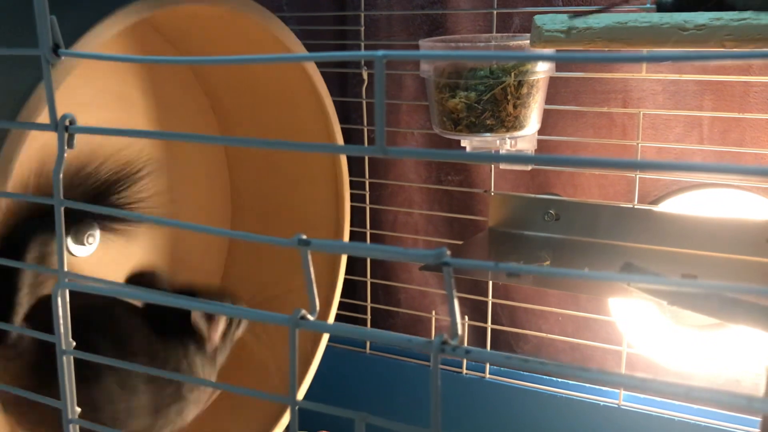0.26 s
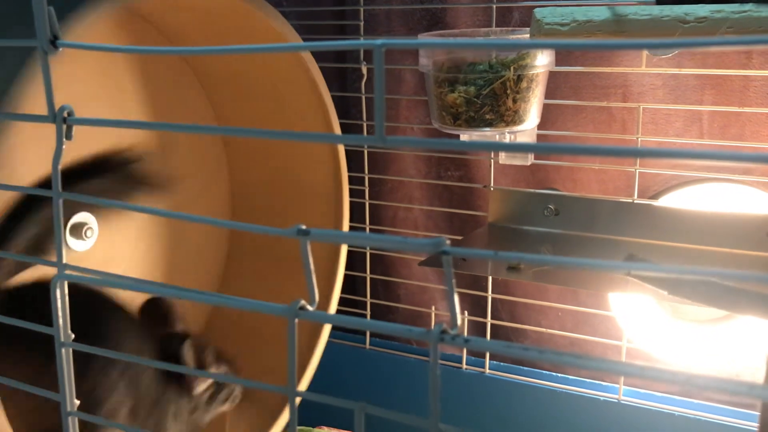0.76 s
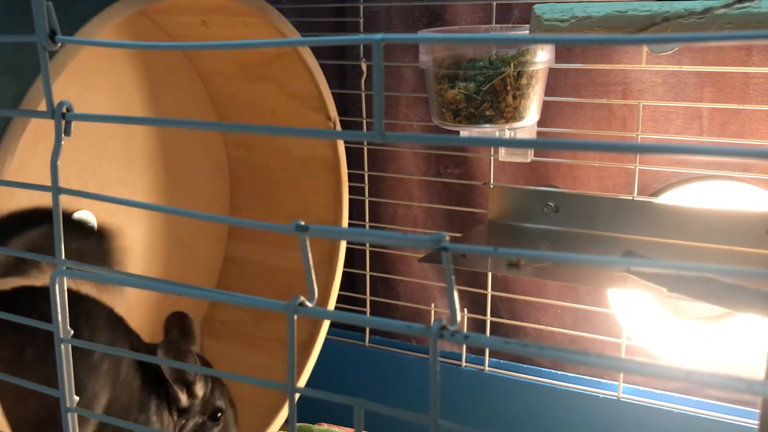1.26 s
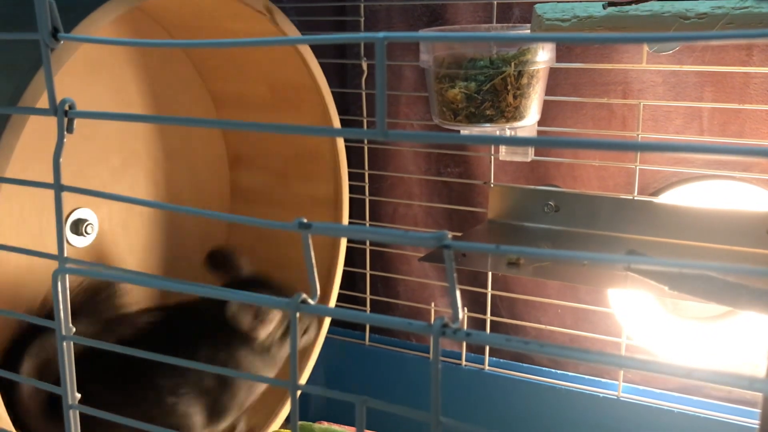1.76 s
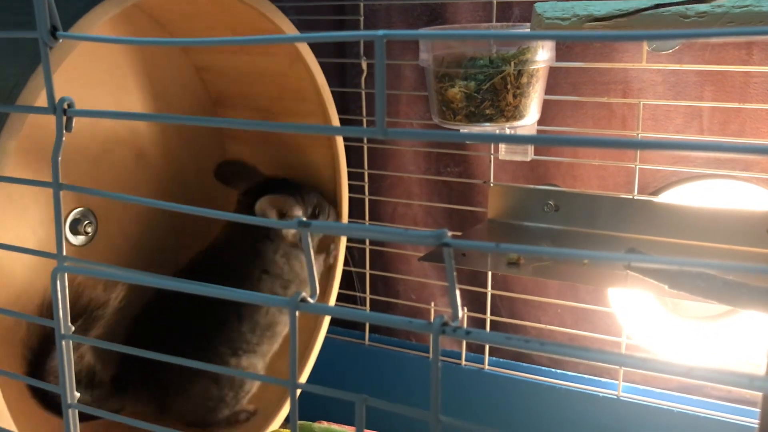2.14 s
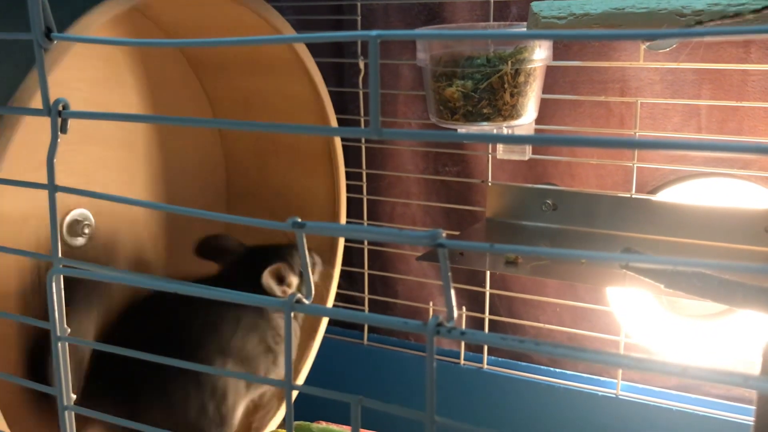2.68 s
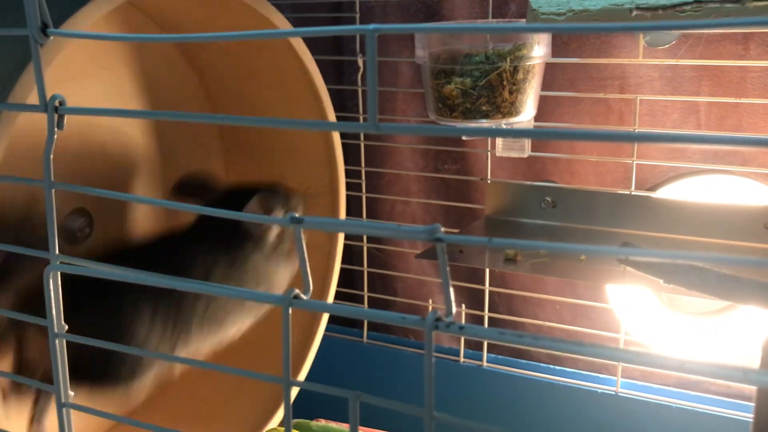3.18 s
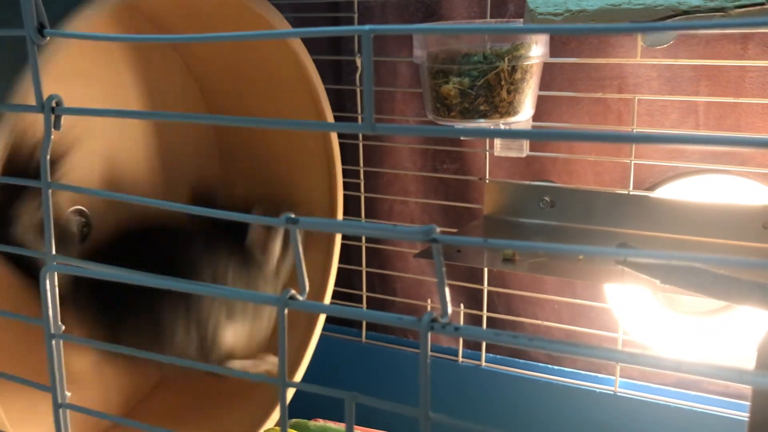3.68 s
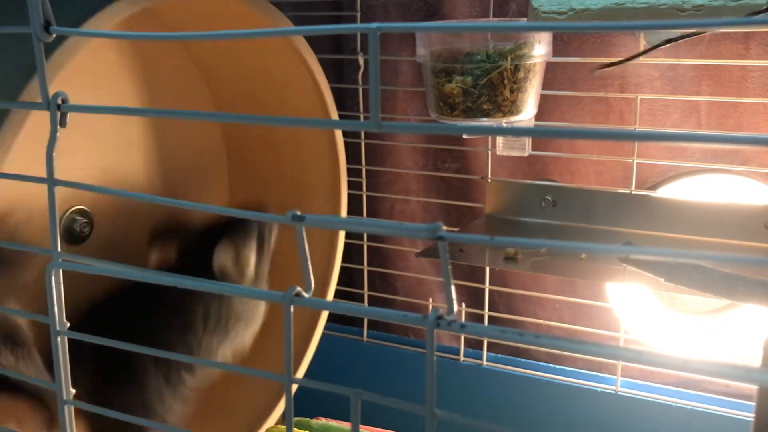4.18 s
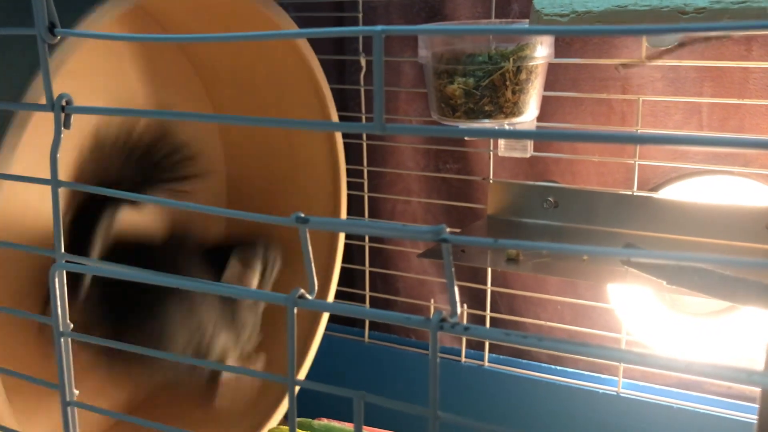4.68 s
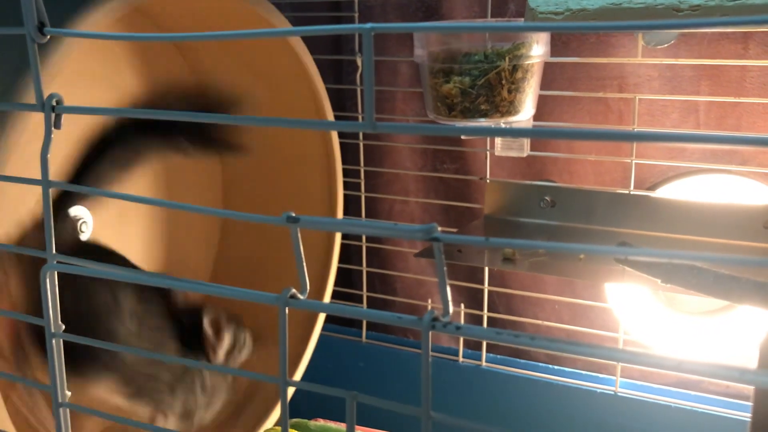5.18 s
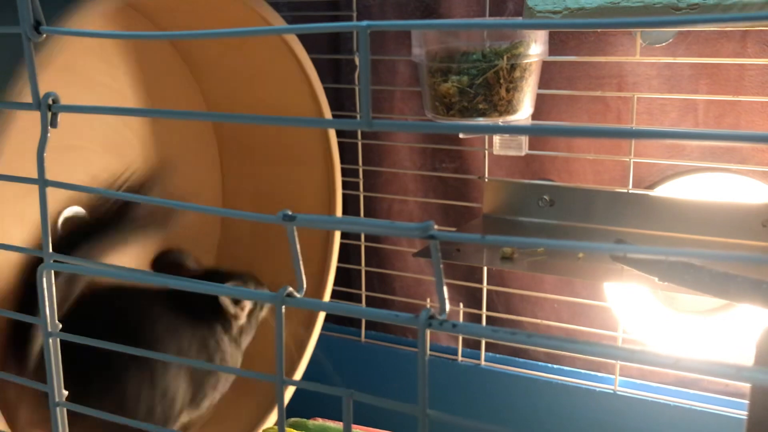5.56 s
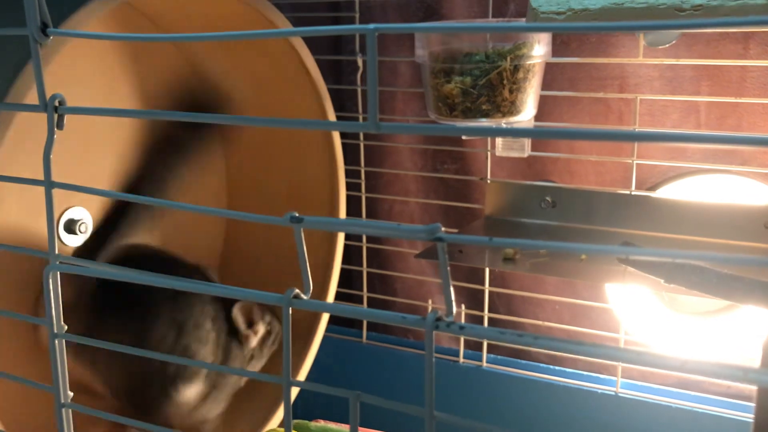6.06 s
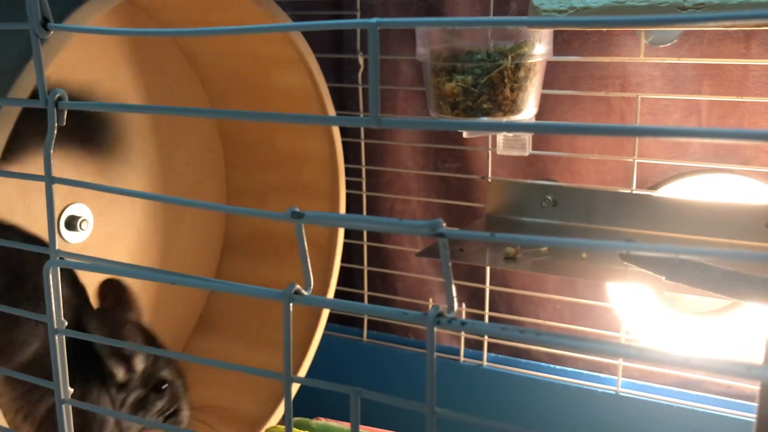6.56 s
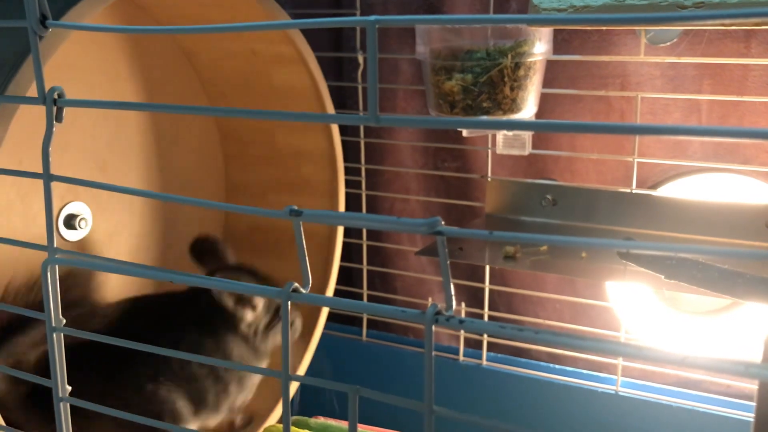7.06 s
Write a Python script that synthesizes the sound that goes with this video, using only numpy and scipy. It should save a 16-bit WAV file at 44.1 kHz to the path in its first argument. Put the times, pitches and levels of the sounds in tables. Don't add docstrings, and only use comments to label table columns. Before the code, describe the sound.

Close, boomy paw thuds and rattling boards from a small animal's exercise wheel come in two bursts, separated by quiet shuffling and light clicks.

```python
import sys
import numpy as np
from scipy import signal
from scipy.fft import rfft, irfft
from scipy.io import wavfile
from scipy.ndimage import uniform_filter1d

SR = 44100
rng = np.random.default_rng(int(sys.argv[2]) if len(sys.argv) > 2 else 0)


def attenuation_scalar(level_db):
    decades = np.asarray(level_db, float) / 20
    return 10 ** decades


def waveform_to_disk(signal):
    frames = np.transpose(np.atleast_2d(signal))
    scaled = np.clip(frames, -1, 1) * 32767
    samples = np.round(scaled).astype(np.int16)
    wavfile.write(sys.argv[1], SR, samples)


N = 323253
CONTROL = 441


def drift_curves(count, smooth):
    points = rng.standard_normal((count, N // CONTROL + 2))
    points = uniform_filter1d(points, size=smooth, axis=1) * np.sqrt(smooth)
    return [np.interp(np.arange(N) / CONTROL, np.arange(len(p)), p) for p in points]


def tinted(x, points):
    hz = np.fft.rfftfreq(N, 1 / SR)
    point_hz, point_db = np.transpose(points)
    gain = attenuation_scalar(np.interp(np.log(hz + 1), np.log(point_hz), point_db, left=-90, right=-90))
    return irfft(rfft(x) * gain / np.sqrt(np.mean(gain ** 2)), N)


def grit(per_s, spread_db, smooth):
    hit, size, fine = rng.random(N), rng.exponential(1, N), rng.standard_normal(N)
    impacts = (hit < per_s / SR) * attenuation_scalar(spread_db * np.minimum(size, 4)) * np.sign(fine)
    force = impacts / np.std(impacts) + smooth * fine
    return force / np.std(force)


def ring(force, modes, between_db, low_hz, high_hz, patchy_db):
    out, energy = 0, 0
    for (hz, width_hz, db), contact in zip(modes, drift_curves(len(modes), smooth=5)):
        r = np.exp(-np.pi * width_hz / SR)
        poles = [1, -2 * r * np.cos(2 * np.pi * hz / SR), r * r]
        zeros = attenuation_scalar(db) * (1 - r) * np.array([1, 0, -1])
        out = out + signal.lfilter(zeros, poles, force * attenuation_scalar(patchy_db * contact))
        energy += attenuation_scalar(2 * db) * (1 - r) * 2
    band = signal.butter(2, [low_hz, high_hz], "band", fs=SR, output="sos")
    fill = signal.sosfilt(band, force) / np.sqrt(2 * (high_hz - low_hz) / SR)
    return out / np.sqrt(energy) + attenuation_scalar(between_db) * fill


def blows(times, db, t60, rise):
    power, t = np.zeros(N + SR), np.arange(SR // 5) / SR
    for s, level, life in zip(times, db, t60 * np.ones(len(times))):
        shape = attenuation_scalar(level - 60 * t / max(life, 0.005)) * (1 - np.exp(-t / rise))
        power[round(s * SR):][:len(t)] += shape ** 2
    return np.sqrt(power[:N])


# pitch_hz, level_db
HISS_COLOUR = [(25, -14.5), (100, -5.5), (200, -20.5), (300, -21.5), (800, -25), (2600, -32), (5000, -37),
               (6000, -33.5), (10400, -41), (12700, -34), (14100, -38.5), (16000, -34)]


def hiss():
    return attenuation_scalar(-71) * tinted(rng.standard_normal(N), HISS_COLOUR)


# pitch_hz, level_db
HUM_TONES = [(118.4, -96), (193.8, -82)]


def hum():
    t = np.arange(N) / SR
    waver = 1 + 0.4 * np.sin(2 * np.pi * 1.7 * t)
    return sum(attenuation_scalar(db + 4.5) * waver * np.sin(2 * np.pi * hz * t) for hz, db in HUM_TONES)


def whine():
    level_db, centre_hz, width_hz, drift_hz = -87.5, 14700, 110, 120
    hz = centre_hz + drift_hz * drift_curves(1, smooth=9)[0]
    fuzz = signal.sosfilt(signal.butter(1, width_hz, fs=SR, output="sos"), rng.standard_normal(N))
    return attenuation_scalar(level_db) * np.sqrt(2) * fuzz / np.std(fuzz) * np.cos(2 * np.pi * np.cumsum(hz) / SR)


# centre_s, half_length_s, level_db
FUR_RUSTLES = [
    (2.8, .07, -81),
    (3.2, .03, -80),
    (3.56, 0.039, -78),
    (5.021, .03, -79),
]


def rustle():
    t = np.arange(N) / SR
    swell = sum(attenuation_scalar(db) * np.exp(-((t - s) / half) ** 2) for s, half, db in FUR_RUSTLES)
    return tinted(swell * grit(3000, 3.0, 0.8), [(4300, -12), (5800, 3), (8500, -6), (13000, -17)])


def background():
    return hiss() + hum() + whine() + rustle()


def room(x):
    t = np.arange(SR // 3) / SR
    echoes = rng.choice([-1., 1.], len(t)) * (rng.random(len(t)) < 0.05) * (t > 0.004)
    low = signal.lfilter([0.2], [1, -0.8], echoes)
    tail = low * attenuation_scalar(-60 * t / 0.48) + (echoes - low) * attenuation_scalar(-60 * t / 0.096)
    return signal.fftconvolve(x, tail / np.linalg.norm(tail))[:N]


# start_s, level_db, pitch_hz
WIRE_TICKS = [(0.581, -48, 12300), (1.6257, -51, 14800), (2.4435, -39.5, 12820), (2.4481, -46, 14400),
              (2.9188, -48, 13800), (2.934, -44, 14100), (2.9577, -49, 15000), (3.1294, -41, 13700),
              (3.1354, -52, 15200), (3.1682, -48, 15200), (3.361, -39, 13500), (3.669, -45, 15450),
              (3.9873, -42.5, 14800), (7.1292, -41, 13900), (7.3163, -50, 14000), (3.425, -47, 13470),
              (5.249, -47, 13500), (5.262, -49, 14500)]


def ticks():
    out, t = np.zeros(N + 400), np.arange(300) / SR
    for s, db, hz in WIRE_TICKS:
        click = np.cos(2 * np.pi * hz * t) * np.exp(-t / 0.00018)
        rattle = 0.13 * rng.standard_normal(len(t)) * np.exp(-t / 0.0024)
        out[round(s * SR):][:len(t)] += attenuation_scalar(db - 2) * (click + rattle)
    return signal.sosfilt(signal.butter(2, 8500, "high", fs=SR, output="sos"), out[:N])


# start_s, level_db, start_pitch_hz, end_pitch_hz, length_s
HUB_POP = (3.696, -43, 240, 520, .023)


def pop():
    s, db, low_hz, high_hz, length = HUB_POP
    out, u = np.zeros(N), np.linspace(0, 1, round(length * SR))
    tone = np.sin(2 * np.pi * np.cumsum(low_hz + (high_hz - low_hz) * u) / SR)
    out[round(s * SR):][:len(u)] = attenuation_scalar(db) * tone * signal.windows.tukey(len(u), 0.4)
    return out


# start_s, length_s, level_db, fade_db (over the slide), brightness_db
FUR_SLIDES = [
    (1.17, 0.053, -62, -9, 2.5),
    (6.251, 0.024, -72.5, 4, 1),
    (6.565, 0.17, -62.5, -1, -2.5),
    (6.816, 0.027, -70.5, -0.5, -3),
    (7.09, 0.063, -61, -16.5, 1),
    (5.124, 0.0074, -66, -5, -12),
    (5.938, 0.0098, -63, -3, -15),
    (6.915, 0.05, -69.5, -8, -10),
    (1.102, 0.008, -61, -5, -3),
]
# pitch_hz, width_hz, level_db
RIM_MODES = [(1260, 310, 6.5), (1700, 84, 9.5), (2850, 480, -6), (3500, 390, 0.5), (5830, 190, 8.5),
             (6500, 592, -6)]
# pitch_hz, level_db (per Hz)
FIZZ_COLOUR = [(2940, -4), (5000, -14), (7710, -7.5), (8620, -4.5), (10700, -10.5), (15000, -8),
               (16000, -22)]


def slides():
    t, body, treble = np.arange(N) / SR, 0, 0
    on_s, off_s = 0.016, 0.01
    for s, length, db, fade_db, bright_db in FUR_SLIDES:
        edge = np.clip(np.minimum((t - s) / on_s + 1, (s + length - t) / off_s + 1), 0, 1) ** 2
        shape = edge * attenuation_scalar(db + fade_db * np.clip((t - s) / length, 0, 1))
        body = body + shape
        treble = treble + shape * attenuation_scalar(bright_db)
    stick = uniform_filter1d(rng.standard_normal(N), size=500) * np.sqrt(500)
    rub = grit(4000, 3.5, 1.5)
    rim = ring(body * attenuation_scalar(1.1 * stick) * rub, RIM_MODES,
               between_db=-6, low_hz=1430, high_hz=5900, patchy_db=0)
    return rim + tinted(treble * attenuation_scalar(2.2 * stick) * rub, FIZZ_COLOUR)


def knocks(rows, rise):
    fuzz_db, wobble_share, flutter_cycles = 4.0, 0.025, 9
    out, t = np.zeros(N + SR), np.arange(SR // 4) / SR
    for (s, db, hz, t60), chance in zip(rows, rng.random((len(rows), 66))):
        life, place = max(t60, 0.01), t * max(hz / flutter_cycles, 124)
        fuzz, wobble = (np.interp(place, np.arange(len(c)), 2 * c - 1, period=len(c)) * np.sqrt(3)
                        for c in np.split(chance[2:], 2))
        turns = np.cumsum(hz * (1 + wobble_share * wobble)) / SR
        partner = turns + (1 + 3.83 * chance[0]) / life * t + chance[1]
        pair = np.sin(2 * np.pi * turns) + 0.58 * np.sin(2 * np.pi * partner)
        decay = attenuation_scalar(db - 60 * t / life + fuzz_db * fuzz)
        out[round(s * SR):][:len(t)] += decay * (1 - np.exp(-t / rise)) * pair
    return out[:N]


# start_s, level_db, pitch_hz, t60_s
HOLLOW_KNOCKS = [(.243, -51.5, 1017, 0.07), (0.532, -51, 1220, 0.28), (0.742, -38, 460, 0.2),
                 (.80, -48.5, 510, 0.12), (2.785, -74, 3130, 0.3), (3.135, -62, 710, 0.13),
                 (3.523, -54.5, 560, 0.073), (3.585, -70, 2550, 0.14), (3.738, -56.5, 1690, 0.045),
                 (4.30, -39, 740, 0.08), (4.89, -49, 456, 0.11), (5.431, -39.5, 546, 0.07),
                 (5.711, -40, 730, 0.035), (5.986, -43.5, 1099, 0.054), (6.126, -54, 1400, 0.048),
                 (6.815, -75, 3600, 0.6), (6.81, -70, 1630, 0.25), (6.867, -66, 1620, 0.27),
                 (7.1, -74, 2500, 0.15), (0.004, -48, 410, 0.099), (0.0056, -57.5, 1200, 0.14),
                 (.072, -47.5, 520, 0.07), (0.22, -48.5, 387, 0.044), (.35, -50, 430, 0.15),
                 (5.112, -50, 480, 0.15), (5.486, -54, 1230, 0.15), (4.524, -50, 410, 0.082),
                 (6.08, -60, 1950, 0.08), (3.775, -64, 1200, 0.05), (3.565, -52, 513, 0.08),
                 (3.56, -68, 1680, 0.066), (4.044, -70, 2900, 0.05), (3.74, -71.5, 3300, 0.16),
                 (6.135, -54.5, 1700, 0.046), (5.176, -42.5, 704, 0.05), (5.03, -55, 590, 0.1),
                 (5.75, -47.5, 820, 0.08), (4.1, -61, 2900, 0.064), (6.192, -51, 1100, 0.076),
                 (7.129, -51, 1200, 0.011), (.531, -47, 721, 0.18), (.091, -52, 451, 0.11),
                 (5.851, -51.5, 630, 0.12), (4.206, -29.5, 235, 0.13), (7.186, -74, 2880, 0.23),
                 (4.462, -31, 205, 0.06)]
# start_s, level_db, pitch_hz, t60_s
TOE_TAPS = [(0.16, -39, 421, 0.06), (0.367, -57.0, 3080, 0.033), (0.521, -51, 2170, 0.04),
            (0.539, -43.5, 1247, 0.095), (0.621, -53, 1640.0, 0.09), (0.661, -45, 964, 0.056),
            (0.666, -39, 684, 0.054), (0.78, -48, 1846, 0.061), (0.892, -48, 1257, 0.048),
            (1.171, -54, 1244, 0.07), (2.468, -65, 1950, 0.04), (2.624, -63.5, 3180, 0.055),
            (2.897, -59, 1060.0, 0.045), (3.241, -63.5, 3194, 0.031), (3.259, -59.5, 444, 0.14),
            (3.4, -51.5, 1116, 0.051), (4.117, -60, 1400.0, 0.14), (4.135, -61, 1742, 0.03),
            (4.135, -63, 3120.0, 0.044), (4.206, -45, 1365, 0.07), (4.276, -50, 4210, 0.048),
            (4.3, -40, 1071, 0.052), (4.46, -41, 1720, 0.037), (4.56, -55, 1586, 0.13),
            (4.61, -46.0, 432, 0.061), (4.732, -57, 1200, 0.1), (4.996, -64, 3390, 0.14),
            (5.136, -52, 3500, 0.033), (5.162, -48, 1204, 0.13), (5.817, -47, 560.6, 0.2),
            (5.941, -57, 3576, 0.037), (5.941, -60, 4220, 0.033), (6.12, -50, 1211, 0.0604),
            (6.19, -58, 2270, 0.06), (6.274, -52, 1130, 0.032), (6.505, -63, 1248, 0.047),
            (6.567, -55, 1267, 0.066), (6.655, -59, 1220, 0.06), (6.591, -62, 3340.0, 0.082),
            (6.697, -65.0, 3770, 0.03), (6.705, -62, 2530, 0.05), (6.751, -52.5, 1200, 0.034),
            (6.751, -59, 1700.0, 0.041), (6.904, -54, 1913, 0.044), (6.902, -67, 3540, 0.1),
            (7.088, -60, 4300, 0.069), (6.645, -66, 5850, 0.35), (6.94, -73, 3330, 0.15)]
# start_s, level_db, pitch_hz, t60_s
PAW_SCUFFS = [(.38, -54, 1045, 0.06), (2.475, -64, 845, 0.05), (2.92, -68, 3300, 0.03),
              (3.015, -65, 1077, 0.078), (3.02, -62.5, 1600, 0.063), (3.245, -63.5, 1160, 0.11),
              (5.998, -42.5, 480, 0.1), (6.005, -48, 719, 0.11), (6.025, -49, 1201, 0.06),
              (6.2, -58, 480, 0.12), (6.215, -52.5, 1166, 0.053)]


def loose_wood():
    return knocks(HOLLOW_KNOCKS, 0.00045) + knocks(TOE_TAPS + PAW_SCUFFS, 0.0011)


# time_s, rumble_db
TURNING = [(0, -49), (.9, -50), (1.06, -56), (1.5, -61), (1.86, -69.5), (2.45, -68.5), (2.94, -64),
           (3.5, -60.5), (3.84, -59), (4.18, -62), (4.22, -41), (4.72, -53), (5.06, -51.5), (5.9, -48.5),
           (6.1, -54), (6.4, -58), (6.8, -63.5), (7.33, -68.5)]


def turning_db():
    return np.interp(np.arange(N) / SR, *np.transpose(TURNING))


# peak_s, drum_db, board_db, boom_pitch_hz
WEIGHT_LOADS = [(0.021, -47.5, -58.5, 115.5), (0.161, -36, -56, 109), (0.254, -43.5, -68, 114.2),
                (0.45, -39, -56, 141.9), (0.486, -43, -61.0, 129.0), (0.533, -43, -51, 106.1),
                (0.651, -42.5, -44.5, 118.8), (0.73, -38.5, -49, 120.6), (0.784, -43.5, -47, 102.2),
                (0.869, -50, -55.0, 138.0), (0.912, -56, -57, 146.5), (0.936, -50, -62, 131.0),
                (1.119, -48.5, -64, 109.1), (1.146, -46.5, -66, 108.0), (1.192, -41, -55.5, 125),
                (1.226, -47.5, -68, 117.4), (1.308, -55.5, -76, 120.6), (3.565, -46.5, -56.5, 144.0),
                (3.609, -47.5, -82, 103.2), (3.638, -49.5, -81, 102.0), (3.715, -48.5, -63, 102.2),
                (4.06, -57, -73, 111.2), (4.168, -61, -78, 106.6), (4.223, -35, -65, 108.4),
                (4.296, -36, -42.5, 122.0), (4.365, -42.5, -50, 111.6), (4.434, -39.5, -66, 114.0),
                (4.484, -36, -63, 117.0), (4.648, -40.5, -61, 97.2), (4.877, -49.5, -66, 108.2),
                (4.924, -51, -66, 127.4), (4.976, -50.5, -76, 116.5), (5.077, -51, -76, 110.8),
                (5.15, -40, -48, 121.3), (5.203, -40, -48, 120), (5.244, -43, -55.5, 135.8),
                (5.285, -44.5, -54, 107.0), (5.445, -44.5, -53, 119.7), (5.507, -38, -63, 137.6),
                (5.555, -38.5, -50, 104.9), (5.615, -45, -70, 127.5), (5.679, -43.5, -59.0, 115.0),
                (5.704, -42, -46, 103.9), (5.777, -38, -50, 109), (5.868, -50, -70, 127.1),
                (5.957, -46.5, -51, 131.7), (6.014, -46, -51.5, 138.0), (6.148, -60, -63, 120.8),
                (6.291, -51, -71, 106.1), (6.35, -53, -70, 100)]


def loads(column, fall_s):
    rise_share, roundness = 0.52, 1.7
    power, t = np.zeros(N), np.arange(N) / SR
    for row in WEIGHT_LOADS:
        s = row[0]
        near = slice(max(round((s - 0.5) * SR), 0), round((s + 0.5) * SR))
        away = np.maximum(t[near] - s, (s - t[near]) / rise_share) / fall_s
        power[near] += attenuation_scalar(2 * row[column] - 20 * away ** roundness)
    return np.sqrt(power)


def boom(load):
    level_db, flutter_db, wander_hz = -3, 2.5, 13
    pitch, flutter = drift_curves(2, smooth=3)
    bent = np.interp(np.arange(N) / SR, [row[0] for row in WEIGHT_LOADS], [row[3] for row in WEIGHT_LOADS])
    phase = 2 * np.pi * np.cumsum(bent + wander_hz * pitch) / SR
    return load * attenuation_scalar(level_db + flutter_db * flutter) * np.sin(phase)


# start_s, claw_db, brightness_db, knock_db (last two relative to the claw)
FIRST_RUN_STEPS = [(0.044, -62, 12, 8), (.1042, -59.5, 8, 13), (.1268, -50, 0, 4), (.157, -47, -20, -12),
                   (.241, -51.5, -9, -7), (0.3462, -55.5, -12, 9), (.367, -41.5, -29, -1.5),
                   (0.413, -45.5, -28, -1.5), (.499, -59, 8, -12), (.52, -37, -16, -3.5),
                   (.6085, -52.5, -23, 12.5), (0.6248, -42, -21, -2), (0.635, -40.5, -11, 0.5),
                   (0.7493, -46, -6, 0), (.7743, -41, -10, -10), (0.781, -45, -14, 6.5),
                   (.8813, -38.5, -32, -1), (1.092, -50.5, 5, 7), (1.1334, -59.5, 12.5, 9),
                   (1.164, -56.5, -2, 14), (1.276, -53, -6, 2)]
LEAP_STEPS = [(4.202, -39.5, -9.5, 7), (4.2718, -38.5, -24, -3), (4.281, -40.5, -3, -6),
              (4.4, -48.5, -18, 5.5), (4.417, -50.5, -20, 8), (4.4594, -35.5, -13, 4),
              (4.524, -44, -20, 1.5), (4.537, -43, -10, -2.5), (4.607, -49, -21, 4), (4.6539, -58, -13, 1),
              (4.6789, -57.5, -20, 2), (4.7265, -54, -11, 6), (4.903, -55, -33, -3), (4.923, -50.5, -31, 2),
              (4.996, -55, -20, -18), (5.025, -55.5, -18, 8)]
SECOND_RUN_STEPS = [(5.138, -39.5, -28, -4), (5.19, -45.5, -25, 2.5), (5.2623, -62, 4, -3),
                    (5.288, -45.5, -22, -14), (5.3858, -55, -19, 14.5), (5.406, -44.5, -39, 3.5),
                    (5.488, -57, -8, 13), (5.54, -57, 2, 7), (5.562, -46, -22, -4), (5.662, -55, -34, 9),
                    (5.679, -45, -29, -5), (5.706, -59, -23, 20), (5.7883, -69, 18, 0),
                    (5.8249, -49, -16, 10.5), (5.943, -44, -36, -1), (5.986, -63.5, -4, 28),
                    (6.0782, -57, -24, -4), (6.123, -58, -21, 5), (6.1888, -61.5, 11, 11),
                    (6.215, -61, 4, 12.5), (6.3631, -50.5, -1, -7), (6.499, -61, 7, -1)]
# start_s, claw_db, brightness_db, knock_db, patch_pitch_hz
SETTLING_STEPS = [
    (6.7498, -57.5, -21, 4.5, 480),
    (6.9006, -56, -20, -11, 1898),
    (6.9189, -58, -5, 0.5, 1000),
    (7.064, -63.5, 12, -23, 4000),
    (7.0882, -56, -18, -30, 2930),
    (7.182, -65, 8, -23, 4600),
]
SHUFFLE_STEPS = [(2.4418, -62, -6, -8, 1770), (2.47, -54, -3, -3, 1400), (2.5688, -54.5, -12, -4.5, 1700),
                 (2.627, -55, -8, -10, 1400), (2.664, -58, -16, 0.5, 1407), (2.7155, -57.5, 0, -5.5, 1880),
                 (2.8386, -57, -3, -1, 1900), (2.897, -57.5, -17, -3.5, 1690), (3.011, -61, -27, 2, 1266),
                 (3.127, -61.5, -11, 2, 1430), (3.2015, -61.5, 7, 3, 1600), (3.24, -65, -54, 9, 1660),
                 (3.283, -61.5, 11, 4, 1860), (3.36, -53, -16, -8, 11000), (3.3972, -52.5, 0, -7, 1310),
                 (3.418, -57, 2, 3.5, 1690)]
FIDGET_STEPS = [(3.548, -59.5, 0, 8.5, 1700), (3.639, -62, 3, -8, 1326), (3.6768, -63, 7, -4, 1880),
                (3.7398, -53.5, -6, -13, 1140), (3.818, -60.5, -14, 3.5, 1840), (3.8989, -62, -13, 8, 1930),
                (3.986, -61.5, -14, 2, 1260), (4.0186, -60, -22, 8, 1300), (4.049, -63, -15, 6, 1330),
                (4.118, -49, -5.5, -11, 1446), (4.137, -52, -17, -5, 1320)]
HARD_DB = -46.2


def footfalls():
    pitched = SETTLING_STEPS + SHUFFLE_STEPS + FIDGET_STEPS
    running = FIRST_RUN_STEPS + LEAP_STEPS + SECOND_RUN_STEPS
    s, claw, bright, knock = np.transpose(running + [row[:4] for row in pitched])
    spot_hz = np.where(claw > HARD_DB, 2220, np.resize([1320, 1410, 1700, 1880], len(s)))
    spot_hz[-len(pitched):] = [row[4] for row in pitched]
    return s, claw, bright, knock, spot_hz


def paw_force(per_s, spread_db, smooth):
    return signal.sosfilt(signal.butter(1, 2530, fs=SR, output="sos"), grit(per_s, spread_db, smooth))


# pitch_hz, width_hz, level_db
DRUM_MODES = [(82, 18, 0), (113, 30, 1), (155, 30, -2), (225, 45, -10)]
BOARD_MODES = [(424, 57, 5), (470.3, 56, 7), (561, 39, 5.5), (701, 35, 2), (813, 64, -6), (977, 56, -3),
               (1083, 47, -1), (1195, 40, 3), (1330, 12, -13)]
TREAD_MODES = [(1690, 25, -6), (1880, 130, 13), (2120, 79, -5), (2520, 100, 9.5), (3236, 480, 10.5),
               (4080, 200, 4), (5700, 520, -9)]
# pitch_hz, width_hz, level_db
SLAT_MODES = [(1130, 150, 9), (1370, 150, 6), (1700, 140, 7.5), (1930, 100, 0), (3140, 330, 3.5),
              (3900, 400, -20)]


def wheel():
    s, claw, bright, knock, spot_hz = footfalls()
    slow = len(SHUFFLE_STEPS + FIDGET_STEPS)
    hard = claw > HARD_DB
    scatter = 0.061 * np.exp(0.0579 * (claw - HARD_DB))

    turn_db = turning_db()
    above = turn_db + 60
    weight = loads(column=1, fall_s=0.036)
    rumble = np.hypot(attenuation_scalar(turn_db), weight)
    rattle = np.hypot(attenuation_scalar(-70 + 0.89 * above), loads(column=2, fall_s=0.05))
    rolling_grit = np.hypot(attenuation_scalar(-72 + 0.43 * above), attenuation_scalar(-12) * rattle)

    scratch = claw + 0.038 * (claw + 45)
    slat = blows(s[-slow:], scratch[-slow:] - 7, 0.087, 0.0033)
    scratch[-slow:] -= 8
    strike = np.zeros(N)
    strike[np.round(s * SR).astype(int) + 40] = attenuation_scalar(scratch + 8.5) * hard
    tip = blows(s, scratch - 7, 0.016, 0.00043)

    drum = np.hypot(blows(s, claw + knock - 1.5, 0.081, 0.0025), 0.41 * rumble)
    board = np.hypot(blows(s, claw + knock - 7, 1.27 * scatter, 0.002), 0.34 * rattle)
    tread = np.hypot(blows(s, scratch - 13, 1.32 * scatter, 0.0038) + tip, 0.18 * rolling_grit)
    fizz = np.hypot(blows(s, claw + bright - 6, 0.96 * scatter, 0.0021), 0.11 * rolling_grit)
    spots = list(zip(s, 0.91 * claw - 11 - 3.4 * hard, spot_hz, np.full(len(s), 0.045)))

    out = ring(drum * paw_force(300, 3.0, 0.6), DRUM_MODES,
               between_db=-15, low_hz=70, high_hz=250, patchy_db=1.5)
    out += ring(1.82 * board * paw_force(500, 3.25, 0.78), BOARD_MODES,
                between_db=-15.5, low_hz=408, high_hz=1400, patchy_db=3.5)
    out += ring(slat * grit(2000, 2.0, 0.56), SLAT_MODES,
                between_db=-16, low_hz=900, high_hz=4300, patchy_db=2.5)
    out += ring(strike + tread * grit(2500, 3.0, 0.92), TREAD_MODES,
                between_db=-8, low_hz=1600, high_hz=6300, patchy_db=4)
    out += tinted(fizz * grit(1700, 3.7, 0.27), FIZZ_COLOUR)
    out += knocks(spots, 0.00045)
    return out + boom(np.hypot(0.3 * attenuation_scalar(turn_db), weight))


def scene():
    cage = ticks() + pop() + slides() + loose_wood() + wheel()
    low_cut = signal.butter(4, 72, "high", fs=SR, output="sos")
    cage = signal.sosfilt(low_cut, cage + attenuation_scalar(-14.5) * room(cage))
    return (cage + background())[None]


def top_cut(x):
    return signal.sosfilt(signal.butter(12, 16480, fs=SR, output="sos"), x)


def record(dry):
    edge = signal.firwin(1023, 15780, fs=SR)
    mix = signal.oaconvolve(dry, edge[None], "same")
    return top_cut(mix)


dry = scene()
out = record(dry)
waveform_to_disk(out)
```